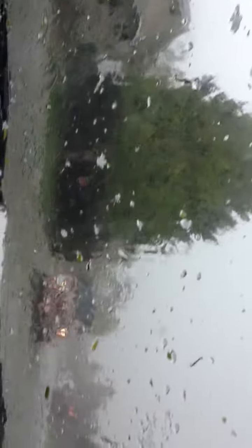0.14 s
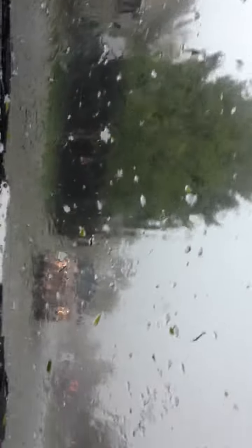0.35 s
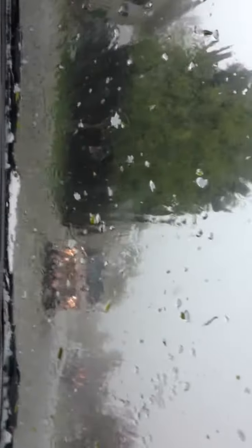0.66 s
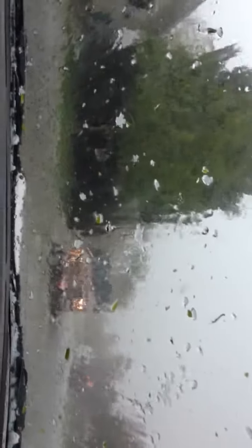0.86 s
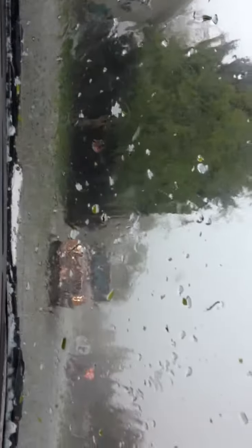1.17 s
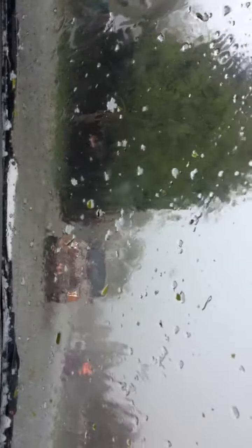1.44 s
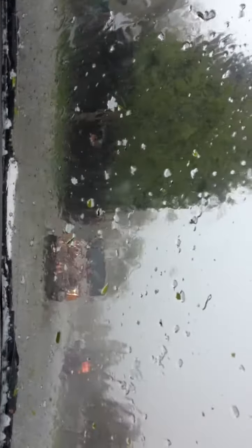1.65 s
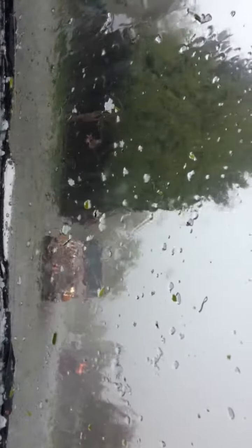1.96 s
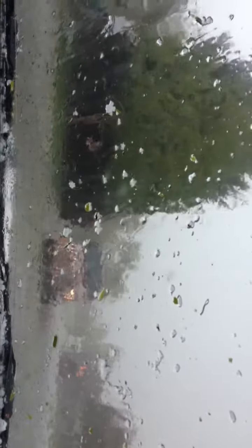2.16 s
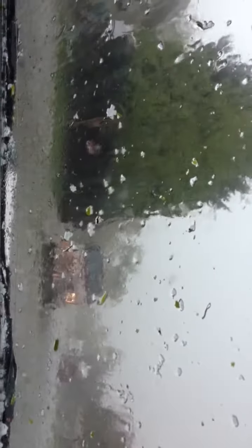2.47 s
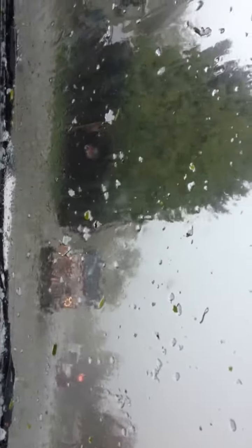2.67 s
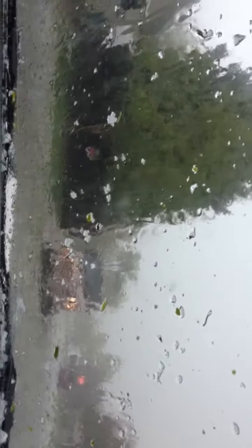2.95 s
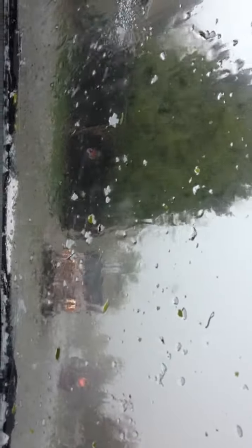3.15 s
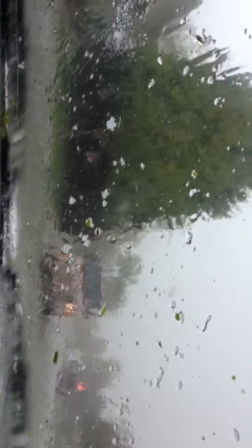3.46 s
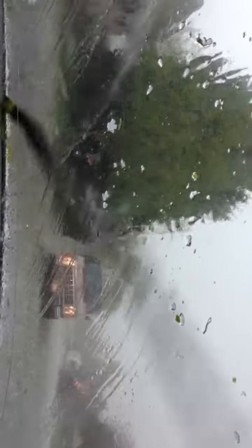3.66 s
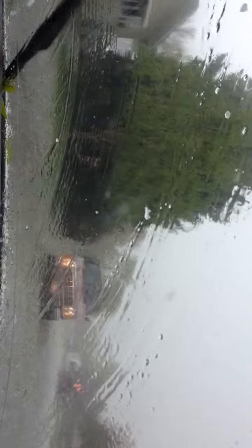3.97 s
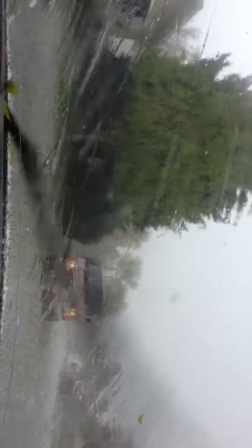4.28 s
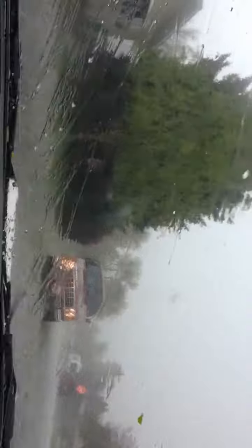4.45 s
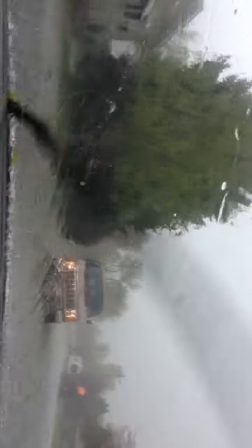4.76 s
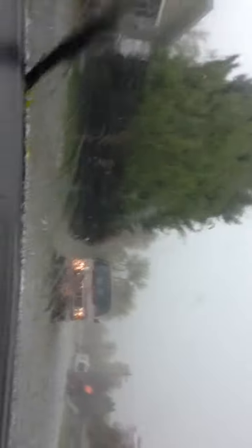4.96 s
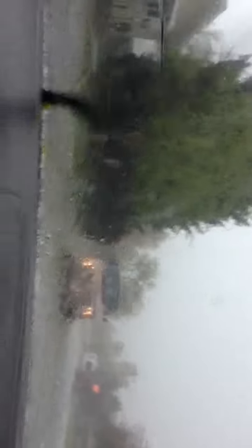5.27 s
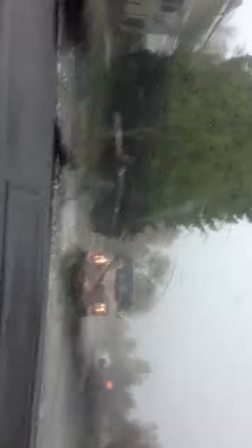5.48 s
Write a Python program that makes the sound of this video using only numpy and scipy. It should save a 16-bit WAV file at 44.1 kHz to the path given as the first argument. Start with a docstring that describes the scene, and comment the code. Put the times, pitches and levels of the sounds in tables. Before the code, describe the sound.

Hail batters a car, heard close from within the small, dry cabin. Sharp knocks on glass mix with duller, farther taps and deep hollow roof thumps that fall slightly in pitch. After a sparse first second the blows come several per second, clustering near the middle and again towards the end. Soft rain hiss and fluctuating low drumming continue behind; peaks are slightly squashed.

```python
"""Hailstones strike the roof and windscreen of a parked car, heard from inside the cabin.
Each stone cracks in a few short decaying tones, then noise bands and panel tones rattle, treble dying first.
Pushes through the roof boom with falling pitch; every listed stone also thuds in its panel.
Behind them, shaped noise makes the drumming, rain and patter, and short noise clicks make the pellets.
The microphone clips softly."""
import sys
import numpy as np
from scipy import signal
from scipy.fft import rfft, irfft, next_fast_len
from scipy.io import wavfile
from scipy.ndimage import uniform_filter1d, map_coordinates

SR = 44100
rng = np.random.default_rng(int(sys.argv[2]) if len(sys.argv) > 2 else 0)


def ratio(d):
    """dB to gain"""
    e = np.asarray(d, float) / 20
    return 10 ** e


def output_pcm(signal):
    """Save a mono or channel-first signal as 16-bit PCM at the path in sys.argv[1].

    Samples are clipped to [-1, 1] before scaling.
    """
    pcm = np.clip(np.atleast_2d(signal).T, -1, 1) * 32767
    wavfile.write(sys.argv[1], SR, np.round(pcm).astype(np.int16))


N = 247842  # length of the scene in samples
LEAD_S = 0.02  # each row of a blow starts this long before its crack


def unit(x):
    """Scale to rms 1 along the last axis."""
    return x / np.sqrt(np.mean(x ** 2, axis=-1, keepdims=True) + 1e-20)


def coloured_noise(spectrum):
    """White noise shaped by (pitch_hz, level_db) points read on a log axis, rms 1."""
    point_hz, point_db = np.transpose(spectrum)
    size = next_fast_len(N + 8192)
    hz = np.fft.rfftfreq(size, 1 / SR)
    gain_db = np.interp(np.log(hz + 1), np.log(point_hz + 1), point_db)
    return unit(irfft(rfft(rng.standard_normal(N), size) * ratio(gain_db), size)[:N])


def wobble(rate_hz):
    """A smooth random curve with rate_hz new values per second."""
    values = rng.standard_normal(int(N * rate_hz / SR) + 4)
    return map_coordinates(values, [np.arange(N) / SR * rate_hz])


def scatter(times_s, sounds):
    """Add up one row of sound per start time."""
    first = np.round(np.asarray(times_s) * SR).astype(int)[:, None]
    at = first + np.arange(sounds.shape[1])
    return np.bincount(np.clip(at, 0, N).ravel(), sounds.ravel(), N + 1)[:N]


# colour of the steady rain on the body: pitch_hz, level_db (per Hz, relative)
RAIN_COLOUR = [(200, -28), (400, 11), (3500, -2), (6000, -16), (15000, -21)]


def steady_rain():
    """Rain on the body: coloured noise whose level wobbles around a steady value."""
    return ratio(-63.5 + 2.0 * wobble(130)) * coloured_noise(RAIN_COLOUR)


# how thickly small hail falls: start_s, level_db (of the patter, before its wobble)
HAIL_THICKNESS = [(0, -45.5), (.28, -42.5), (.66, -61), (.85, -54.5), (1.22, -49), (1.7, -56.5),
                  (1.82, -44), (2.12, -55), (2.27, -58.5), (2.88, -60), (3.03, -46), (3.41, -65),
                  (3.5, -41), (3.72, -43.5), (3.97, -52), (4.3, -43.5), (4.47, -62), (4.85, -36),
                  (4.97, -66), (5.17, -41.5), (5.34, -54.5), (5.62, -57)]


def thickness_db(time_s):
    """Read the hail thickness at any moment, in straight lines between the points."""
    return np.interp(time_s, *np.transpose(HAIL_THICKNESS))


# colour of the drumming shell: pitch_hz, level_db (per Hz, relative)
DRUM_COLOUR = [(15, -51), (35, -14), (60, -3.5), (130, 1.5), (184, -2), (254, -18.5), (400, -21.5),
               (520, -110)]


def drumming():
    """Countless far blows drum in the shell: low noise that swells half as many dB as the patter."""
    level_db = -14.5 + 0.5 * thickness_db(np.arange(N) / SR)
    return ratio(level_db + 4.9 * wobble(27)) * coloured_noise(DRUM_COLOUR)


# colour of the patter on the glass: pitch_hz, level_db (relative)
PATTER_COLOUR = [(150, -8), (250, 8.5), (534, -7.5), (781, -9.5), (4030, -14.5), (5040, -24), (13700, -37),
                 (15500, -45)]


def patter():
    """Countless far blows patter on the glass: noise that swells when small hail falls thickly."""
    level_db = thickness_db(np.arange(N) / SR)
    lumps_db = 2.2 * wobble(40) + 3 * wobble(300)
    return ratio(level_db + lumps_db) * coloured_noise(PATTER_COLOUR)


# pellets that tick clearly between the stones: start_s, level_db (before filtering)
CLEAR_TICKS = [(0.0448, -33), (0.412, -41), (0.861, -46), (1.0635, -46), (1.11, -36.5), (1.1625, -33),
               (1.9124, -41), (3.0904, -49), (3.8023, -35.5), (4.122, -38), (4.414, -45.5)]


def pellets(count=330, size=1024):
    """Small pellets tick on the glass: bright noise snaps with short tails, at random and listed moments."""
    listed_s, listed_db = np.transpose(CLEAR_TICKS)
    u = rng.random((count + len(listed_s), 3))
    start_s = np.append(u[:count, 0] * N / SR, listed_s)
    random_db = -57 - 5.5 * np.log(u[:count, 1] + 0.02)
    level_db = np.append(random_db, listed_db)[:, None]
    t60_s = 0.006 + 0.03 * u[:, 2:]
    click = rng.standard_normal((len(u), size)) * ratio(-60 * np.arange(size) / SR / t60_s)
    bright = signal.butter(1, [2800, 8000], "bandpass", fs=SR, output="sos")
    return scatter(start_s, ratio(level_db) * signal.sosfilt(bright, click))


def burst(t, pitch_hz, t60_s):
    """A struck tone: quick soft start, then a steady decay."""
    return np.sin(2 * np.pi * pitch_hz * t) * ratio(-60 * t / t60_s) * (1 - np.exp(-t / 0.00072))


def glass_crack(since, treble_db, crack_hz):
    """A few cycles of the glass with a brief overtone, one bounce, a low push and splintering ice."""
    t = np.maximum(since, 0)
    ringing, wait, bounce, bounce_pitch = rng.standard_normal((4, len(crack_hz), 1))
    longer = np.exp(0.66 * ringing)  # some stones ring the glass longer than others
    crack = burst(t, crack_hz, 0.0082 * longer) / np.sqrt(longer)
    crack = crack + 0.62 * burst(t, 1.45 * crack_hz, 0.0044)
    # the stone bounces once, soon after and mostly weaker
    flight_s = 0.0028 + 0.0099 * np.abs(wait)
    bounce_hz = crack_hz * np.exp(0.16 * bounce_pitch)
    crack = crack + ratio(-11.5 + 2.9 * bounce) * burst(np.maximum(t - flight_s, 0), bounce_hz, 0.0058)
    # the blow dents the panel: one low push
    crack = crack + 0.4 * burst(t, 300, 0.016)
    # the ice splinters; noise minus itself three samples away is bright
    white = rng.standard_normal((len(crack_hz), len(since) + 3))
    splinters = (white[:, 3:] - white[:, :-3]) * (since >= 0)
    return crack + splinters * ratio(0.5 * treble_db - 20.0 - 60 * t / 0.00086)


def pre_echo(since, noise, hz):
    """A pre-echo, not part of the blow itself: faint narrow noise smeared ahead of the crack."""
    narrow = unit(irfft(noise * np.exp(-((hz - 2900) / 550) ** 2), len(since)))
    level_db = -29 + 4 * rng.standard_normal((len(noise), 1)) + 1300 * since
    return narrow * (since < 0) * ratio(level_db)


# tones of the roof panel: pitch_hz
PANEL_HZ = [396, 589.5, 691.5, 755, 964, 1238, 1413]


def panel_knock(t, panel_db, spread_s):
    """The panel knocks in its own modes, in a new mix for every spot that is hit."""
    knock = 0
    for mode_hz in PANEL_HZ:
        detune, mix = rng.standard_normal((2, len(panel_db), 1))
        ring = burst(t, mode_hz * (1 + 0.025 * detune), 54 / mode_hz)  # t60 is about 54 cycles
        knock = knock + ratio(-4 + panel_db + 3.86 * mix) * ring * (1 - np.exp(-t / spread_s))
    return knock


# struck shell, band by band: pitch_hz, level_db (relative), t60_s (before the spread scales it)
SHELL_BANDS = [(340, -4, 0.14), (826, -0.5, 0.086), (940, -1, 0.11), (2350, 0.5, 0.079), (3380, 0.5, 0.065),
               (4670, -8, 0.068), (6770, -2.5, 0.069), (11940, -10, 0.039)]


def shell_rattle(t, noise, hz, panel_db, treble_db, spread_s):
    """Noise bands swell and die, each at its own speed."""
    centres = np.log([row[0] for row in SHELL_BANDS])
    rattle = 0
    for k, (centre_hz, level_db, t60_s) in enumerate(SHELL_BANDS):
        share = np.interp(np.log(hz + 1), centres, np.arange(len(SHELL_BANDS)) == k) * (hz > 220)
        gain_db = level_db + 2.32 * rng.standard_normal((len(noise), 1))
        gain_db = gain_db + panel_db * (centre_hz < 1500) + treble_db * (centre_hz > 6000)
        # bending waves are slower the lower they are, so the low bands swell later
        rise = 1 - np.exp(-(t / (spread_s * np.sqrt(3400 / centre_hz))) ** 2)
        decay_db = -60 * np.maximum(t - spread_s, 0) / (t60_s * (0.86 + 40 * spread_s))
        rattle = rattle + ratio(gain_db + decay_db) * rise * unit(irfft(noise * share, len(t)))
    return rattle


def blows(crack_db, rattle_db, panel_db, treble_db, crack_hz, size=6144):
    """One row per stone: the glass cracks, with a pre-echo ahead, then panel and shell rattle."""
    columns = (crack_db, rattle_db, panel_db, treble_db, crack_hz)
    crack_db, rattle_db, panel_db, treble_db, crack_hz = (c[:, None] for c in columns)
    since = np.arange(size) / SR - LEAD_S
    t = np.maximum(since, 0)
    hz = np.fft.rfftfreq(size, 1 / SR)
    noise = rfft(rng.standard_normal((len(crack_db), size)))
    # each spot of the shell has its own narrow resonances
    spot = unit(uniform_filter1d(rng.standard_normal(noise.shape), size=14, axis=1))
    noise = noise * ratio(2.4 * spot)
    # a far stone has little crack over its rattle, and its rattle swells and dies slowly
    spread_s = np.clip(0.00086 + 0.00064 * (rattle_db - crack_db + 16.5), 0.0008, 0.012)
    crack = glass_crack(since, treble_db, crack_hz) * (1 - np.exp(-t / (spread_s - 0.0007)))
    ahead = pre_echo(since, noise, hz)
    # the rattle comes in uneven lumps, as echoes off glass and seats do
    lumps = rng.standard_normal((len(crack_db), size))
    lumps = ratio(2.8 * unit(uniform_filter1d(lumps, size=50, axis=1)))
    rattle = panel_knock(t, panel_db, spread_s)
    rattle = rattle + shell_rattle(t, noise, hz, panel_db, treble_db, spread_s)
    return ratio(crack_db + 2.0) * (crack + ahead) + ratio(rattle_db + 1.5) * lumps * rattle


def far_stones(count=220):
    """Small, dull, distant stones at random moments, louder when the patter is louder."""
    u = rng.random((count, 5))
    start_s = u[:, 0] * N / SR
    rattle_db = thickness_db(start_s) - 8 - 3 * np.log(u[:, 1] + 0.08)
    crack_db = rattle_db + 12 * u[:, 4]
    panel_db = -3 + 10 * u[:, 2]
    crack_hz = 2500 + 2500 * u[:, 3]
    return scatter(start_s, blows(crack_db, rattle_db, panel_db, np.full(count, -22), crack_hz))


def bending_pushes(rows, size=16384):
    """Bending waves: delay grows as 1 / sqrt(Hz), so the pitch falls. Rows: start_s, peak_db, pitch_hz."""
    start_s, peak_db, pitch_hz = (c[:, None] for c in np.transpose(rows))
    hz = np.fft.rfftfreq(size, 1 / SR)
    band = np.exp(-(np.log((hz + 1) / pitch_hz) / 0.31) ** 2)
    path = 0.77  # delay in s times sqrt(Hz)
    lead_s = 0.06  # room for the high part that arrives before start_s
    cycles = 2 * path * np.sqrt(hz) - hz * path / np.sqrt(pitch_hz) + hz * lead_s
    wave = irfft(band * np.exp(-2j * np.pi * cycles), size)
    # the cabin air keeps humming a little after the push
    t = np.arange(size // 2) / SR
    cabin = unit(rng.standard_normal((len(rows), size // 2))) * ratio(-33.5 - 60 * t / 0.26)
    wave = wave + signal.fftconvolve(wave, cabin, axes=1)[:, :size]
    wave = wave / np.abs(wave).max(axis=1, keepdims=True)
    return scatter(start_s[:, 0] - lead_s, ratio(peak_db) * wave)


# booms of the roof: start_s, peak_db, pitch_hz
ROOF_BOOMS = [(0.136, -23.5, 135.4), (0.37, -20.5, 193), (0.445, -20.5, 181), (0.599, -29, 129),
              (0.853, -19, 119), (0.915, -21, 310), (1.124, -16, 124), (1.291, -17, 197),
              (1.519, -14, 158.5), (1.595, -21.5, 165), (1.68, -19.5, 173.5), (1.821, -18, 140),
              (1.947, -19.5, 116), (1.991, -17.5, 161), (2.098, -14, 122), (2.123, -13, 171.6),
              (2.164, -18, 132), (2.196, -18, 146), (2.371, -21.5, 153), (2.41, -20, 145),
              (2.46, -16.5, 384), (2.534, -13, 179), (2.63, -18, 133.5), (2.935, -21, 179),
              (3.018, -9, 306), (3.027, -10.5, 138), (3.197, -21, 198.7), (3.307, -20.5, 119.4),
              (3.507, -19.5, 186), (3.788, -13, 147), (3.813, -19.5, 130), (4.12, -24, 135.4),
              (4.237, -26, 131.5), (4.788, -9.5, 143), (4.89, -14.5, 119.3), (4.989, -19.5, 195.6),
              (5.153, -16, 131), (5.182, -23, 135.4), (5.215, -17.5, 140), (5.423, -19, 138),
              (5.484, -21, 127.6)]


def roof_booms():
    """Heavy pushes spread through the roof as bending waves and boom."""
    return bending_pushes(ROOF_BOOMS)


def panel_thuds():
    """Each listed stone pushes into the panel that it hits, a little after its crack."""
    start_s, _, rattle_db, panel_db, _ = np.transpose(STONE_BLOWS)
    pitch_hz = 383.8 * np.exp(0.13 * rng.standard_normal(len(start_s)))
    return bending_pushes(np.transpose([start_s + 0.008045, rattle_db + panel_db - 1, pitch_hz]))


# stones that stand out: start_s, crack_db and rattle_db (before the fixed boosts in blows),
# panel_db and treble_db (both relative to the rattle)
STONE_BLOWS = [(0.0808, -13, -27.5, -3.5, -9), (0.1941, -6.5, -19, -7, -14.5), (0.228, -18.5, -29, 5.5, -4),
               (0.237, -18.5, -31.5, 4, -12), (0.2528, -36, -39, 6, -12), (0.3105, -26, -41.5, -25, 1.5),
               (0.337, -37, -46.5, 14, -23), (0.4485, 0.5, -23.5, 0, -14.5), (0.564, -41.5, -47, 7, -34),
               (0.889, -32, -44, 12.5, -43), (0.989, -39.5, -53, 19.5, -33),
               (1.0095, -11, -23.5, -2.5, -23), (1.2152, -33.5, -40.5, 4.5, -23), (1.257, -10, -34, 6, -5),
               (1.3726, -2, -23, -2.5, -11), (1.4962, -13.5, -27, 4.5, -13.5), (1.552, -38, -50, 13.5, -20),
               (1.6659, 0, -19, -6, -8), (1.7546, -15, -30, 2.5, -10), (1.794, -35, -45, 4, -25),
               (1.8118, -33.5, -41.5, 7.5, -22), (1.8787, -19.5, -71, -4, -24),
               (1.973, -30, -41.5, 6.5, -39), (1.9926, -1, -31, 6.5, -15), (2.074, -34, -50, 11, -30),
               (2.0883, -11, -21.5, 6, -43), (2.1648, -32, -39.5, 5.5, -39), (2.2094, -3.5, -24.5, 1, -10),
               (2.349, -42.5, -55, 15, -32), (2.373, -8.5, -24, -1.5, -5.5), (2.4548, -3, -26.5, -0.5, -11),
               (2.5217, -28, -37.5, 13.5, -26), (2.5887, -11, -20.5, -0.5, -9.5),
               (2.722, -46, -54, 25, -32), (2.74, -2, -21, -7.5, -20.5), (2.9309, 4.5, -25.5, -2, -10),
               (3.0103, -19.5, -34, 9, -14.5), (3.0648, -39, -49, 7, -25), (3.116, -35, -46.5, 4, -16),
               (3.189, -5, -22.5, -8.5, -5.5), (3.2644, -17, -30, -5.5, -9.5), (3.3278, -24.5, -38, 1, -9),
               (3.458, -45, -53, 19, -25.5), (3.499, -13, -25.5, 2, -8), (3.568, -20.5, -23.5, -4, -16),
               (3.6137, -6.5, -21.5, -6, -7.5), (3.636, -15.5, -29.5, -3.5, -22),
               (3.6447, -17, -28, -2.5, -20), (3.759, -43, -49, 10, -12), (3.8891, -1, -22.5, -12.5, -8.5),
               (3.988, -13, -26.5, -8, -6), (4.0883, -26, -40, 7, -20), (4.154, -23.5, -33, 4, -15),
               (4.169, -9.5, -34, -5, -13), (4.2372, -1, -24, -9, -7.5), (4.308, -7.5, -22.5, -7.5, 2),
               (4.3242, -5.5, -33, -2, 4), (4.3925, -30.5, -45.5, 3, -32), (4.517, -47, -49.5, -2, -20),
               (4.5848, -40.5, -50, 14, 1), (4.634, -42, -47.5, 8.5, -19), (4.696, -35, -59, -8, 8),
               (4.725, -36.5, -45, 7.5, -25), (4.7637, -8.5, -22.5, -0.5, -8),
               (4.776, -10, -24.5, 3.5, -37), (4.837, -13, -24.5, -3, -3.5), (4.861, -2, -28, -11, -10),
               (4.866, -12.5, -23.5, -2.5, -19), (4.9766, -3.5, -24, -2, -7),
               (5.0291, -12, -27, -10.5, -7.5), (5.093, -16, -25, 1, -18), (5.113, -34, -34, 1, -27),
               (5.129, -24, -31.5, 10, -18), (5.252, -38, -49.5, 12, -12), (5.267, -29, -43, 8.5, -5),
               (5.393, 0, -14.5, -6.5, -12), (5.5047, -18, -31.5, -13, -4), (5.523, -10.5, -30.5, -14, -8)]


def stones():
    """The stones that stand out; soft ones crack at less certain, mostly lower pitch."""
    start_s, crack_db, rattle_db, panel_db, treble_db = np.transpose(STONE_BLOWS)
    usual, extra = rng.standard_normal((2, len(start_s)))
    # scatter is in natural log of pitch; it grows with the distance of crack_db from 0
    crack_hz = 3700 * np.exp(0.1 * usual - 0.0069 * np.abs(crack_db * extra))
    return scatter(start_s - LEAD_S, blows(crack_db, rattle_db, panel_db, treble_db, crack_hz))


def scene():
    """Everything at one microphone."""
    background = steady_rain() + drumming() + patter() + pellets() + far_stones()
    return (background + roof_booms() + panel_thuds() + stones())[None]


def band_limit(x):
    """A steep low-pass at the top of the band."""
    return signal.sosfilt(signal.butter(12, 16460, fs=SR, output="sos"), x)


def record(dry):
    """The microphone clips the loudest cracks softly, then a steep filter cuts the top."""
    clipped = dry / (1 + np.abs(dry / 1.01) ** 6) ** (1 / 6)
    top_cut = signal.cheby1(8, 1, 15100, fs=SR, output="sos")
    mix = signal.sosfilt(top_cut, clipped)
    return band_limit(mix)


dry = scene()
out = record(dry)
output_pcm(out)
```